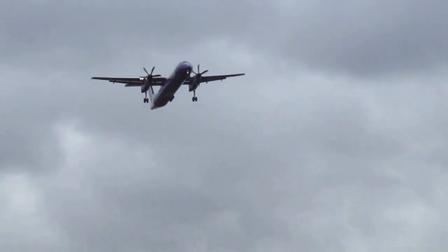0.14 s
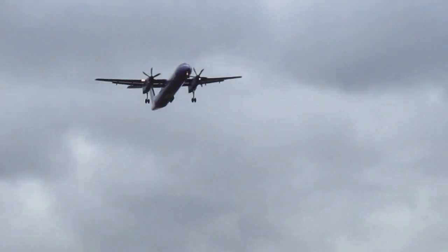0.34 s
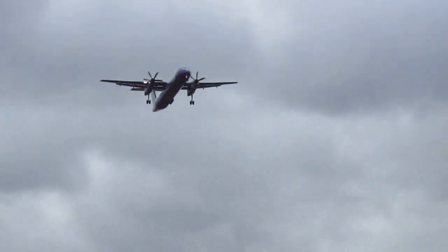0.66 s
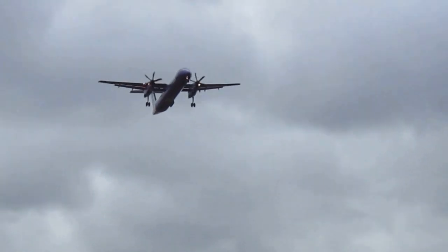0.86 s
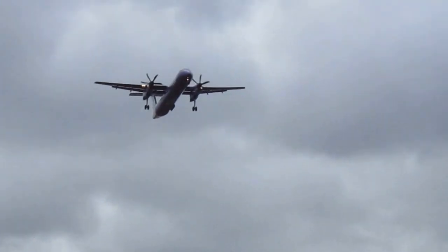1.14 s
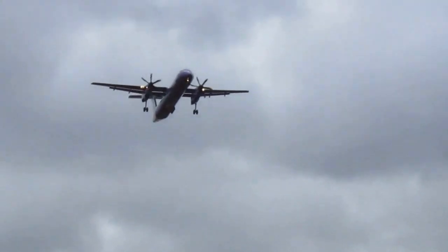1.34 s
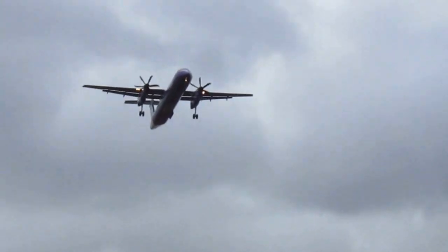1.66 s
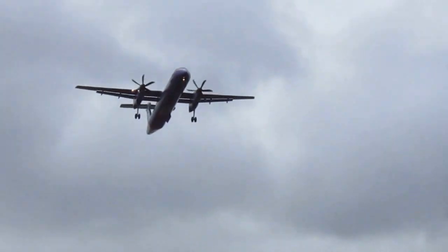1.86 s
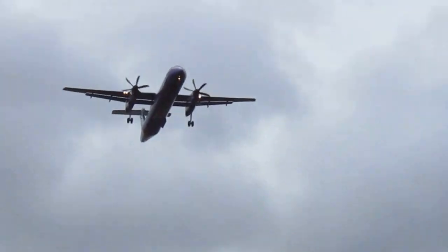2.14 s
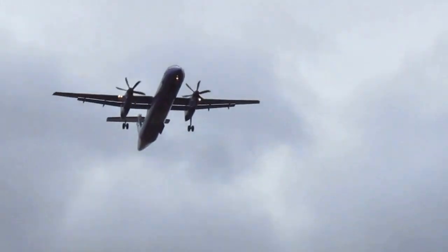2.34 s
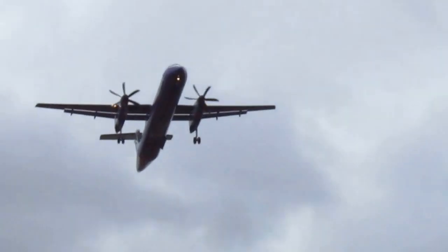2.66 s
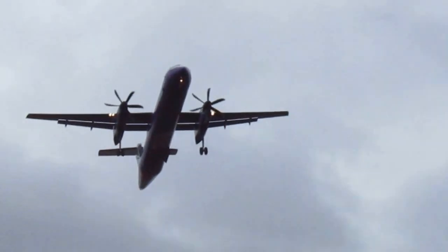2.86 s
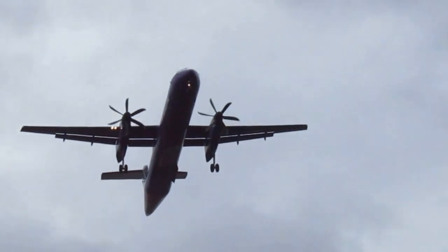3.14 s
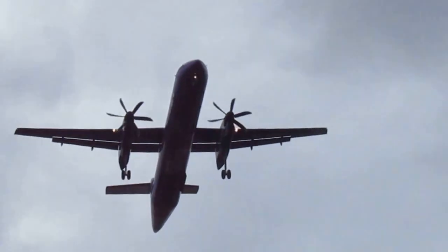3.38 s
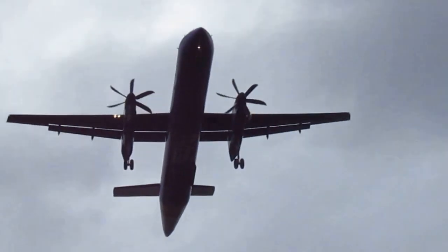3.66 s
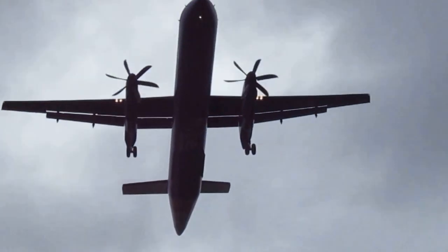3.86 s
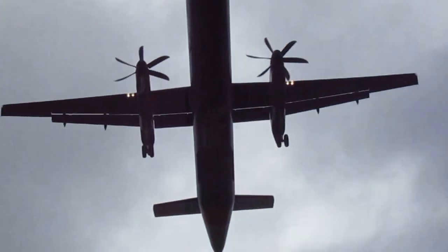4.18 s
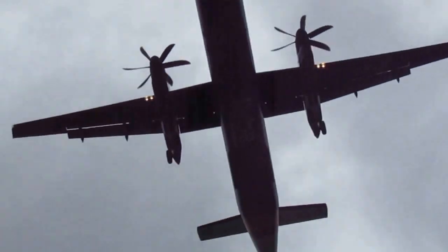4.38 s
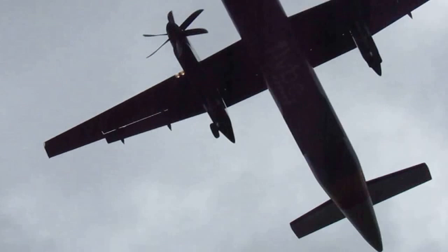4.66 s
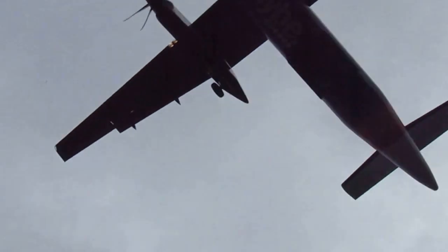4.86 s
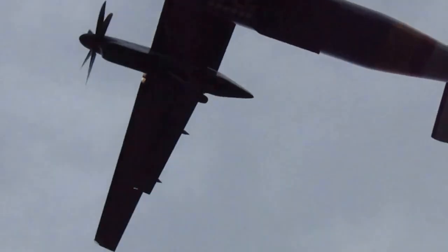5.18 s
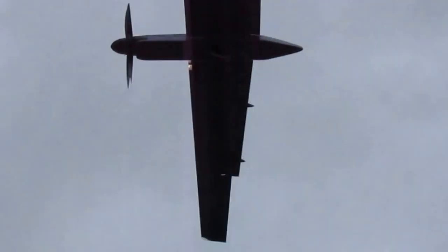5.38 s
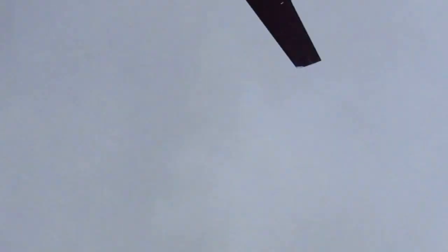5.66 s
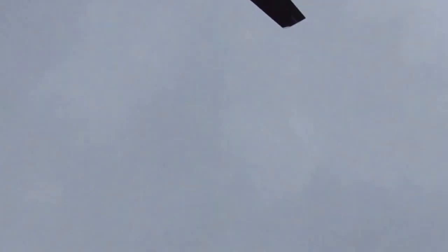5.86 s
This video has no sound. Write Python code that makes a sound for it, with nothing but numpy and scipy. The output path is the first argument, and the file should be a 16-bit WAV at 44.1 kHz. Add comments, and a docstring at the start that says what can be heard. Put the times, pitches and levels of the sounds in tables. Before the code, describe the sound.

A twin-propeller airliner approaches and passes low overhead with a swelling roar, whine and hum, while wind gusts buffet the microphone.

```python
"""A twin-propeller airliner comes in low. At first its roar is faint, and gusts buffet the small
microphone of a hand-held camera, whose limiter turns the sound down after the hardest blows.
From about 3 s the roar swells and brightens, joined by a breathy turbine whine and the hum of the
propeller blades. The hardest blow of wind lands near 4.5 s. At about 5.5 s the plane passes
overhead, and the whine and the hum sink in pitch as it goes by."""
import sys
import numpy as np
from scipy import signal
from scipy.fft import rfft, irfft
from scipy.io import wavfile
from scipy.ndimage import uniform_filter1d, map_coordinates

SR = 44100
rng = np.random.default_rng(int(sys.argv[2]) if len(sys.argv) > 2 else 0)


def wav_record(signal):
    """Record a signal, one row per channel, as 16-bit PCM in the file named by sys.argv[1]."""
    frames = np.transpose(np.atleast_2d(signal))
    bounded = np.clip(frames, -1, 1)
    # unit amplitude maps onto the largest positive 16-bit level
    quanta = np.round(bounded * 32767).astype(np.int16)
    wavfile.write(sys.argv[1], SR, quanta)


N = 265482


def from_db(db):
    """Turn decibels into a number to multiply a sound by."""
    return 10 ** (np.asarray(db) / 20)


def rms_one(x):
    """Scale a signal so that its average size (rms) is 1."""
    return x / np.sqrt(np.mean(x ** 2) + 1e-20)


def in_time(rows):
    """Join a table's rows with straight lines: one curve for each column after the time."""
    times, *columns = np.transpose(rows)
    return [np.interp(np.arange(N) / SR, times, column) for column in columns]


def at_hz(spectrum, hz):
    """Look up the level at a frequency, with octaves evenly spaced."""
    freqs, levels = np.transpose(spectrum)
    return np.interp(np.log(hz), np.log(freqs), levels)


def drift(rate):
    """A smooth random wobble of size 1; a higher rate makes it faster."""
    r = np.exp(-40 * np.pi * rate / SR)
    slow = signal.lfilter([1], [1, -2 * r, r * r], rng.standard_normal(N // 20 + 2002))[2000:]
    return np.interp(np.arange(N) / 20, np.arange(len(slow)), rms_one(slow))


def bands(spectrum, low_hz, high_hz):
    """Give a noise as narrow (frequency, band) slices; those from low to high add up to rms 1."""
    edges = 22 * 2 ** np.arange(0, 9.7, 1 / 5)   # five bands to an octave
    white = rng.standard_normal((2, N))   # neighbours get unrelated noise
    centres = np.sqrt(edges[:-1] * edges[1:])
    inside = (centres > low_hz) & (centres < high_hz)
    gains = from_db(at_hz(spectrum, centres)) * np.sqrt(centres)
    gains = gains / np.sqrt(np.sum(gains[inside] ** 2))
    for k, hz in enumerate(centres):
        sos = signal.butter(3, edges[k:k + 2], "band", fs=SR, output="sos")
        yield hz, gains[k] * rms_one(signal.sosfilt(sos, white[k % 2]))


def puff(length_ms, colour_db, crack_ms):
    """A short burst of noise with peak 1; above 2 kHz it lasts only as long as the crack."""
    ms = np.arange(2048) / SR * 1000
    hz = np.arange(1025) * SR / 2048 + 10
    body, crack = (rms_one(np.roll(age * np.exp(-age), 64) * rng.standard_normal(2048))
                   for age in (3 * ms / length_ms, 3 * ms / crack_ms))
    low_share = 1 / (1 + (hz / 2000) ** 2)
    spectrum = low_share * rfft(body) + (1 - low_share) * rfft(crack)
    burst = irfft(spectrum * from_db(colour_db(hz))) * signal.windows.tukey(2048, .05)
    return burst / np.abs(burst).max()


def place(rows, puffs):
    """Put each burst at its row's time and peak level."""
    out = np.zeros(N + 2048)
    for (s, db, *_), burst in zip(rows, puffs):
        start = max(round(s * SR) - 64, 0)
        out[start:start + 2048] += from_db(db) * burst
    return out[:N]


# Tone colour of the hiss: f/Hz, level/dB
HISS_COLOUR = [(3000, 0), (8000, -1), (11500, 0), (13500, -9), (16000, -16)]
def hiss():
    """The camera's electronics make a faint, steady hiss."""
    return from_db(-85) * sum(band for hz, band in bands(HISS_COLOUR, 6000, 16000) if hz > 2500)


# Small clicks: t/s, peak level/dB, length/ms
CLICKS = [(0.6584, -42, 6.4), (0.6704, -48, 6.5)]
def clicks():
    """Two thin, dry clicks on the camera's body."""
    thin = [(4000, -40), (7000, -6), (10000, 5), (13000, -1), (16000, -13)]   # f/Hz, level/dB
    return place(CLICKS, [puff(ms, lambda hz: at_hz(thin, hz), ms) for _, _, ms in CLICKS])


# Light wind that never quite stops: t/s, level/dB, rumble boost for all the wind/dB
BREEZE = [(0, -15.5, -12), (.21, -44, -4), (.3, -36.5, -12.5), (1, -34, -10.5), (1.6, -36, -6.5),
          (1.85, -41.5, -10.5), (2.4, -41.5, -16), (2.6, -39, -6.5), (3.5, -34, -19.5), (4.5, -28.5, -3.5),
          (5, -33, -9.5), (5.3, -38, -23), (6.02, -29, -23)]
# Gusts: t/s, length/s, start level/dB, end level/dB, brightness (share of 1.5-5 kHz)/dB
GUSTS = [(0, 0.093, -13, -35, -26.5), (0.447, 0.037, -26.5, -30, -16.5), (.52, 0.076, -27.5, -28, -18.5),
         (0.664, 0.096, -23, -22, -12.5), (0.765, 0.11, -18, -14, -11.5), (0.979, 0.18, -30, -27.5, -13.5),
         (1.169, 0.082, -21.5, -15.5, -13), (1.256, 0.2, -30, -19, -21), (1.529, 0.088, -27.5, -19, -26.5),
         (1.677, 0.12, -33.5, -31, -27.5), (2.407, 0.082, -28.5, -21, -25.5), (2.502, 0.19, -28, -14.5, -6),
         (2.668, .11, -8.5, -19.5, -9), (2.772, 0.35, -28.5, -31, -23), (3.119, 0.1, -28.5, -28, -27.5),
         (3.334, 0.18, -30.5, -25, -35), (3.563, 0.32, -27.5, -26, -13), (3.928, 0.23, -22, -24, -12),
         (4.126, 0.074, -18.5, -17.5, -19.5), (4.216, 0.3, -18, -17.5, -20),
         (4.642, 0.048, -30.5, -18.5, -11.5), (4.743, 0.22, -33.5, -28, -28.5),
         (5.475, 0.032, -27, -15, -26), (5.577, 0.05, -22.5, -28, -37), (5.633, 0.11, -13, -25.5, -19)]
BREEZE_BRIGHT_DB, EDDY_BRIGHT_DB = -30, -8.5   # brightness of the breeze and of EDDY_COLOUR
def wind_curves():
    """Strength, brightness and rumble in dB: gusts rise over the breeze; the strongest sets the tone."""
    edge_s, rumble_s = 0.022, 0.14   # gusts come and go quickly, their rumble more slowly
    t = np.arange(N) / SR
    breeze_db, deep_db = in_time(BREEZE)
    power = from_db(2 * breeze_db)
    colour = power * BREEZE_BRIGHT_DB
    for s, length, start_db, end_db, bright_db in GUSTS:
        gate = np.clip(np.minimum(t - s, s + length - t) / edge_s + .5, 0, 1)
        gust = gate ** 2 * from_db(2 * np.interp(t, [s, s + length], [start_db, end_db]))
        power = power + gust
        colour = colour + gust * bright_db
    smeared, dull = uniform_filter1d([power, -colour], size=round(rumble_s * SR))
    large_eddy_db = 0.3339 * (dull / smeared + EDDY_BRIGHT_DB)   # duller gusts rumble more
    rumble_db = 10 * np.log10(smeared / power) + deep_db + large_eddy_db
    return 10 * np.log10(power), colour / power, rumble_db


def brightening(hz, bright_db):
    """Smaller, faster swirls of air sound brighter: tip the tone like a seesaw around 500 Hz."""
    return (bright_db - EDDY_BRIGHT_DB) * np.clip(np.log(hz / 500) / np.log(2600 / 500), -.3, 1.6)


# Tone colour of eddies (swirls of air) on the microphone: f/Hz, level/dB
EDDY_COLOUR = [(25, -24.5), (45, 0), (100, 1.5), (250, -0.5), (500, -1.5), (900, -2.5), (1500, -7.5),
               (3300, -26.5), (5700, -47.5), (9000, -62.5), (15000, -92)]
def wind():
    """Air swirls over the microphone in lumps that hit all bands at once, most sharply in the treble."""
    strength_db, bright_db, rumble_db = wind_curves()
    lumps = drift(25)
    spikes = 2 * np.tanh(drift(250) / 2)
    out = 0
    for hz, band in bands(EDDY_COLOUR, 100, 1200):
        treble = np.clip(np.log(hz / 60) / np.log(40), 0, 1.4)
        flicker = from_db((2.0 + 0.34 * treble) * lumps + 9.0 * treble * spikes + 1.58 * drift(21.6))
        bass_db = (rumble_db + 1.5) * np.clip(np.log(140 / hz) / np.log(2), 0, 1)
        out = out + rms_one(flicker) * band * from_db(strength_db + brightening(hz, bright_db) + bass_db)
    return out


# Hard blows of wind: t/s, peak level/dB, brightness/dB
BUFFETS = [(0.01, -11, 9), (0.035, -18, -19), (0.243, -14, -30.5), (0.256, -28, -1), (0.291, -18.5, -14),
           (0.372, -11, -10), (0.382, -8.5, -4), (0.617, -18.5, -17), (0.652, -23, -24), (0.721, -15.5, -3),
           (0.774, -7, -7.5), (0.809, -5.5, -4.5), (0.819, -11, -19), (0.832, -5, -8), (0.843, -3.5, -11),
           (0.865, -6.5, 1), (1.004, -7, -25), (1.063, -5.5, -23), (1.178, -8.5, -13), (1.197, -7.5, -5.5),
           (1.208, -3.5, -18), (1.219, -13.5, 10), (1.243, -13, -1), (1.304, -6.5, -24), (1.358, -6, -19),
           (1.389, -16, -3), (1.416, -9.5, -10.5), (1.454, -6.5, -15), (1.528, -15.5, -19),
           (1.577, -4.5, -21.5), (2.465, -15.5, -12), (2.52, -15, -13), (2.555, -8, -16), (2.57, -7, -6),
           (2.644, -17, -18), (2.673, -2, -20), (2.708, -4, -19), (2.714, -6.5, 0), (2.73, -8.5, -13),
           (3.128, -11.5, -17.5), (3.503, -7.5, -27), (3.584, -11, -25), (3.67, -12, -23),
           (3.712, -2.5, -4.5), (3.943, -5.5, -5.5), (4.15, -11.5, -15), (4.163, -4, -1), (4.242, -14, -15),
           (4.264, -8.5, -6), (4.274, -5, -5), (4.324, -3, -11.5), (4.414, -2.5, -50), (4.472, 6.5, -5.5),
           (4.683, -16.5, -14), (4.882, -2.5, -16), (4.897, -6, -21)]
def buffets():
    """Single eddies hit the microphone hard, too briefly to carry the deep rumble."""
    def colour_db(hz, bright_db):
        bass_cut_db = 10 * np.log10(1 + (180 / hz) ** 2)
        return at_hz(EDDY_COLOUR, hz) + brightening(hz, bright_db) - bass_cut_db
    hits = [puff(length_ms=5.1, colour_db=lambda hz: colour_db(hz, bright_db), crack_ms=1.55)
            for _, _, bright_db in BUFFETS]
    return place(BUFFETS, hits)


# Echoes: t/s, lowest f cancelled by the lower echo/Hz, lower echo level/dB, overhead echo level/dB
ECHOES = [(0, 623, -17, -39.5), (2, 640, -12, -33.5), (3.5, 736, -12.5, -37), (4.5, 820, -13, -31),
          (5, 940, -19, -13), (5.3, 1040, -18, -18), (6.02, 1080, -13, -20)]
def near_echoes(x):
    """Nearby surfaces send the sound back a moment late, which weakens some frequencies."""
    notch_hz, lower_db, overhead_db = in_time(ECHOES)
    overhead_notch_hz = 1140   # from a dull surface, heard most with the plane overhead
    lower = map_coordinates(x, [np.arange(N) - SR / 2 / notch_hz], order=3)
    overhead = np.roll(uniform_filter1d(x, size=5), round(SR / 2 / overhead_notch_hz))
    return x + from_db(lower_db) * lower + from_db(overhead_db) * overhead


def doppler():
    """Pitch factor of a plane in level flight: higher as it comes, lower as it leaves."""
    speed_m_per_s, sound_m_per_s, height_m, overhead_s = 58, 343, 70, 5.45
    ahead_m = speed_m_per_s * (overhead_s - np.arange(N) / SR)
    return 1 / (1 - speed_m_per_s / sound_m_per_s * ahead_m / np.hypot(ahead_m, height_m))


def narrow_noise(hz, width_hz):
    """A narrow band of noise that follows a moving pitch."""
    sos = signal.butter(3, width_hz / 2, fs=SR, output="sos")
    real, imag = signal.sosfilt(sos, rng.standard_normal((2, N)))
    tone = np.exp(2j * np.pi * np.cumsum(hz) / SR)
    return rms_one(((real + 1j * imag) * tone).real)


# Turbine whine: t/s, f at the plane/Hz, level compared with the roar/dB
WHINE = [(0.8, 6300, -17), (1.7, 6204, -16.5), (2.9, 6470, -7.5), (3.5, 6860, -10), (4, 6790, -6),
         (4.6, 7080, -4), (5, 7000, -3), (5.3, 7230, -.5), (5.55, 7090, 0), (5.8, 6960, 3), (6.02, 6890, 7)]
def whine(roar_db):
    """Rough air smears the tone of the engine's compressor into a narrow hiss."""
    source_hz, over_db = in_time(WHINE)
    hz = source_hz * doppler()
    core = narrow_noise(hz, width_hz=540) * from_db(2.6 * drift(25))
    breath = from_db(-5.5) * narrow_noise(.94 * hz, width_hz=1200)
    octave = from_db(-22) * narrow_noise(2 * hz, width_hz=1080)
    return from_db(roar_db + over_db) * rms_one(core + breath + octave)


# Propeller hum: t/s, level of the lowest tone/dB, level of its octave/dB
BLADE_LEVELS = [(2.5, -61, -59), (3.1, -50, -48), (3.3, -48, -34), (3.7, -45, -30.5), (4, -57, -36),
                (4.6, -57, -39), (5, -45, -43), (5.17, -30, -42), (5.27, -26, -48), (5.5, -34, -36),
                (5.6, -31, -25.5), (5.68, -20.5, -30.5), (6.02, -24.5, -27.5)]
BLADE_RATE_HZ = 106   # at the plane
def propellers():
    """The blades beat the air, making clean tones at one, two and three times their rate."""
    first_db, second_db = in_time(BLADE_LEVELS)
    phase = 2 * np.pi * np.cumsum(BLADE_RATE_HZ * doppler()) / SR
    return sum(np.sqrt(2) * from_db(db + 0.4 * drift(10)) * np.sin(k * phase)
               for k, db in enumerate([first_db, second_db, second_db - 10], start=1))


# Tone colour of the roar from close by: f/Hz, level/dB
ROAR_COLOUR = [(30, -19.5), (80, -12), (400, -2), (1000, -7), (2000, -13), (4000, -18.5), (6000, -21.5),
               (9000, -22.5), (12000, -26.5), (14000, -42), (16000, -59)]
# The plane drawing near: t/s, roar level around 3.5 kHz/dB, loss in the air at 10 kHz/dB
APPROACH = [(0, -67.5, 66), (1, -75, 76), (1.7, -57.5, 57.5), (3, -51, 52.5), (3.5, -46, 26.5),
            (4.5, -44.5, 24.5), (5.05, -45.5, 15), (5.3, -42.5, 11.5), (6.02, -38, 5.5)]
def roar():
    """Noise from the plane's body and exhaust; the air soaks up treble, and rough air makes it waver."""
    level_db, loss_db = in_time(APPROACH)
    loss_power = 2.23   # how steeply the loss grows with frequency
    waver_db = 1.3 * drift(16)
    out = 0
    for hz, band in bands(ROAR_COLOUR, 2500, 5000):
        lost_db = loss_db * ((hz / 10000) ** loss_power - (3500 / 10000) ** loss_power)
        flutter_db = waver_db * min(hz / 5000, 2) + 1.24 * drift(6.5)
        out = out + band * from_db(level_db - lost_db + flutter_db)
    return out


def scene():
    """Add the plane, the wind and the camera's own noises into one channel."""
    roar_db, _ = in_time(APPROACH)
    plane = near_echoes(roar()) + whine(roar_db) + propellers()
    return (plane + wind() + buffets() + clicks() + hiss())[None]


def record(dry):
    """A limiter turns loud peaks down and recovers steadily; overshoot and the top treble are cut off."""
    limit_db, release_db_per_s, attack_ms, cutoff_hz = -4, 67, 1, 15700
    over_db = np.maximum(20 * np.log10(np.abs(dry[0]) + 1e-9) - limit_db, 0)
    recovery_db = release_db_per_s * np.arange(N) / SR
    held_db = np.maximum.accumulate(over_db + recovery_db) - recovery_db
    r = np.exp(-1000 / (attack_ms * SR))
    ducked = dry * from_db(-signal.lfilter([1 - r], [1, -r], held_db))
    treble_cut = signal.cheby2(12, 70, cutoff_hz, fs=SR, output="sos")
    return signal.sosfilt(treble_cut, np.clip(ducked, -1, 1))


dry = scene()
out = record(dry)
wav_record(out)
```